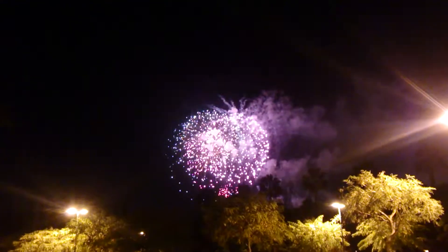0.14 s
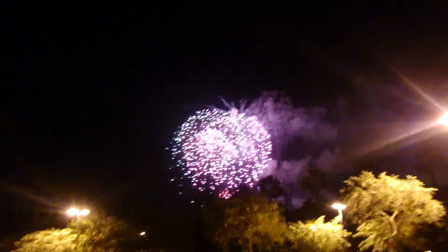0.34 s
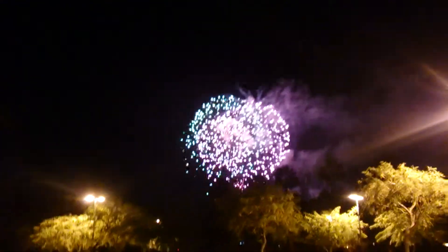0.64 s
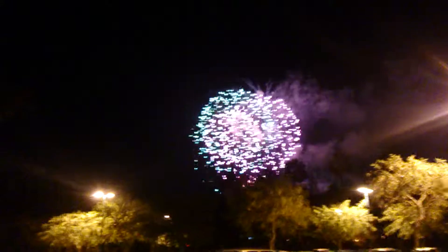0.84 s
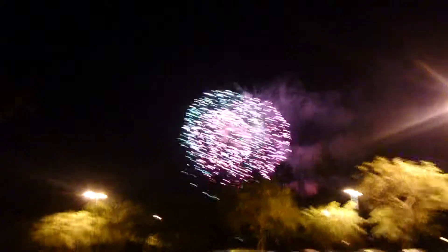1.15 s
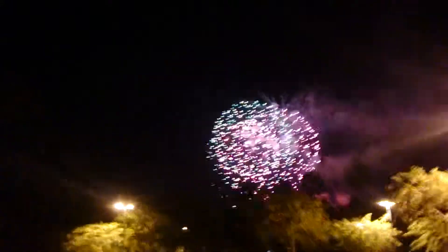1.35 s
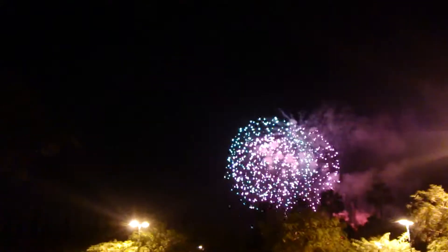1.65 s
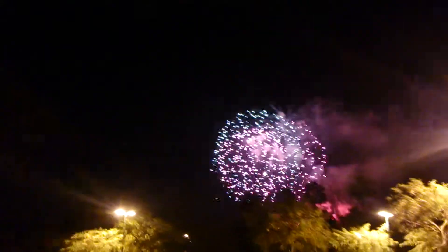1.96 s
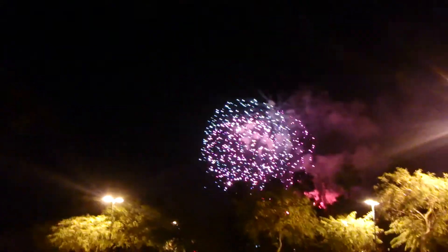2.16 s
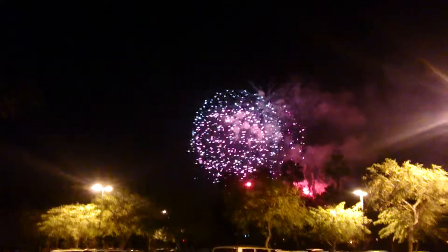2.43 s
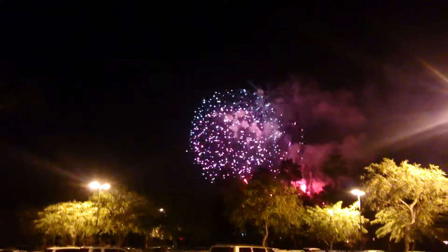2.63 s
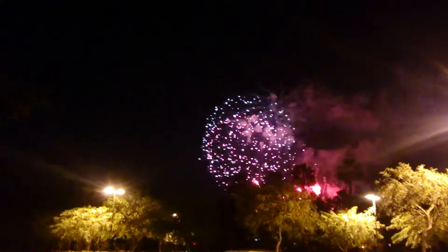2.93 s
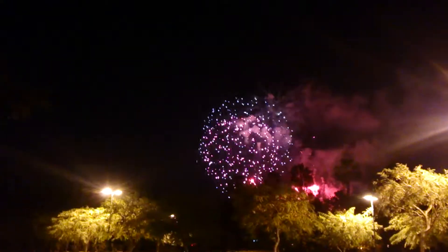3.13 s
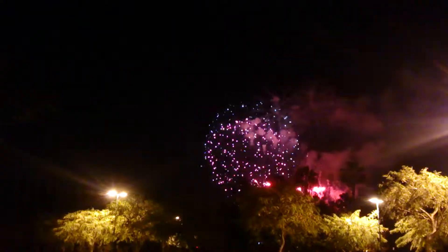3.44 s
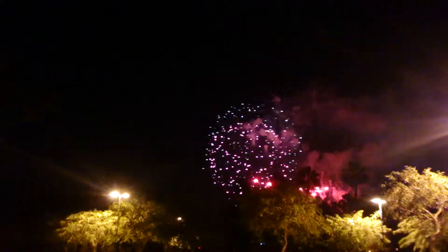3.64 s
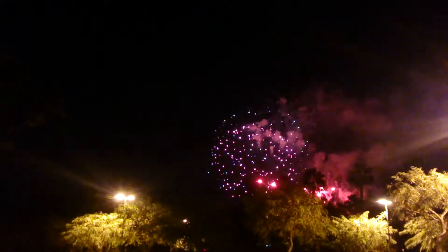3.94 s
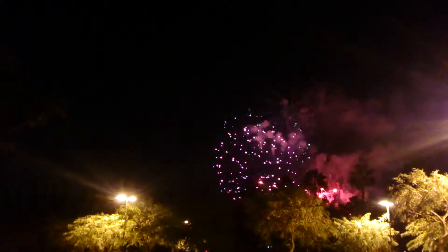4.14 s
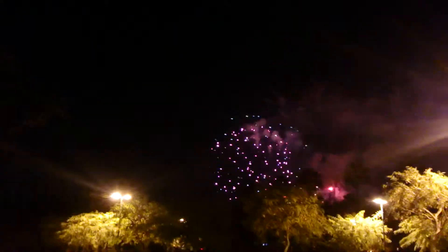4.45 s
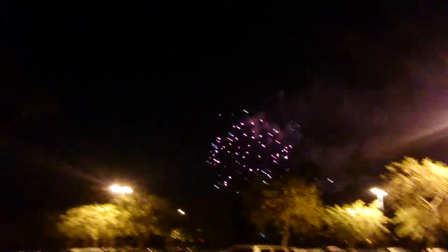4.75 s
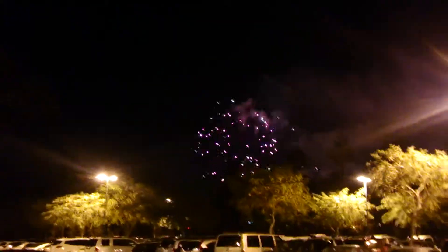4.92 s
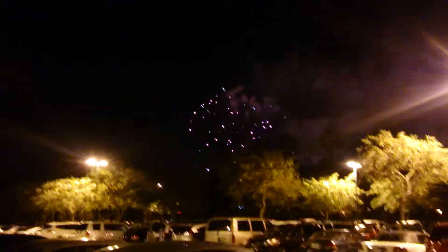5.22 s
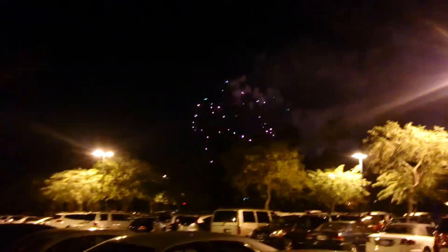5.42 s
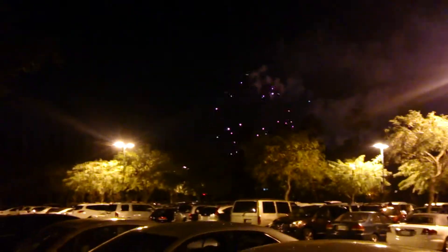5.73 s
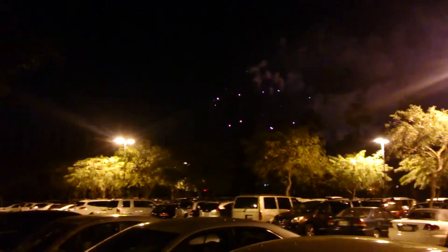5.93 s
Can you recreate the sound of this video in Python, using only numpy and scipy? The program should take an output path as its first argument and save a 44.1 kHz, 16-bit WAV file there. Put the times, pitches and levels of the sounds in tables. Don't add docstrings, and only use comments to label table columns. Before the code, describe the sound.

Loud distant aerial firework bursts in the first second and a half, rolling echoes dying away, small muffled pops, then plastic clicks and finger rubbing.

```python
import sys
import numpy as np
from scipy import signal
from scipy.fft import rfft, irfft, next_fast_len
from scipy.io import wavfile
from scipy.ndimage import uniform_filter1d

SR = 44100
rng = np.random.default_rng(int(sys.argv[2]) if len(sys.argv) > 2 else 0)


def boost(x):
    u = np.asarray(x, float) / 20
    return 10 ** u


def unload_audio(sound):
    columns = np.transpose(np.atleast_2d(sound))
    steps = np.round(np.clip(columns, -1, 1) * 32767)
    wavfile.write(sys.argv[1], SR, steps.astype(np.int16))


N = 268110
SPLIT = np.array([[0.5], [-0.5]])

# frequency_hz, density_db
HUM_SPECTRUM = [(8.8, -26), (15, -2.5), (38, 2.5), (95, -13.5), (114, -27), (130, -21.5), (170, -45),
                (290, -120)]
ROLL_SPECTRUM = [(59, -31.5), (100, -4.5), (216, -1.5), (309, -8.5), (409, -5.5), (973, -10), (1110, -14.5),
                 (1970, -17.5), (5000, -52.5), (6500, -77), (11000, -120)]
HISS_SPECTRUM = [(60, -41), (110, -18.5), (170, -6.5), (320, -13), (700, -9.5), (1000, -15), (2200, -18.5),
                 (2800, -26.5), (4000, -30), (8000, -36), (13500, -40), (16000, -46.5)]
# frequency_hz, correlation (no unit)
PORT_LIKENESS = [(60, 0.81), (150, 0.95), (380, 0.89), (950, 0.049), (2380, -0.071), (5980, -0.13),
                 (15000, 0.19)]
# frequency_hz, difference_db
FAR_PAN = [(60, -9), (130, -4), (290, -4.5), (640, -3.5), (1400, -7.5), (2400, -8), (4400, -1.5),
           (7500, -8.5), (10300, 6.5), (15000, 0)]
NEAR_PAN = [(60, -26), (200, -3), (700, -6), (1300, -3.5), (2400, -22), (4400, -9), (5400, -7), (6400, -29),
            (7600, -27), (8800, -22), (9800, -7.5), (12000, -17), (15000, -19)]
# start_s, peak_db, pitch_hz
POPS = [(1.297, -32.5, 302), (1.411, -34, 700), (2.099, -34, 646), (2.444, -32, 380), (2.606, -35.5, 820),
        (2.765, -31.5, 571), (2.79, -31.5, 560), (2.842, -33, 373), (3.003, -30.5, 960), (3.03, -30, 716),
        (3.115, -38, 597), (5.972, -32.5, 450), (6.015, -39, 350)]
# start_s, length_s, pitch_hz, level_db
SQUEAKS = [(1.33, 0.17, 13800, -78), (1.35, .18, 15000, -83), (1.566, 0.12, 13800, -84),
           (1.94, .07, 12250, -77), (4.654, 0.051, 11870, -60.5), (4.834, 0.14, 7400, -70),
           (4.885, .045, 8460, -75), (4.93, .055, 6700, -77), (4.944, .045, 8000, -79),
           (5.002, .07, 8620, -77), (5, 0.079, 6200, -77), (4.998, .03, 7200, -75), (5.1, .04, 7900, -75),
           (5.138, 0.033, 11920, -71), (5.147, 0.033, 6300, -72)]
# start_s, length_s, pitch_hz, level_db, glide_hz_per_s
SLIDES = [
    (2.059, 0.25, 8700, -70, -780),
    (4.447, 0.13, 2020, -74, -480),
    (4.83, .34, 14650, -81, 1030),
    (4.862, 0.26, 1935, -70, -680),
]
# late_s, length_s, pitch_hz, level_db
HINGE_PARTIALS = [(0, 0.14, 12230, -72), (0.015, 0.14, 5800, -70.5), (0.026, .135, 6290, -70)]
# start_s, low_partials_db, low_length_share (no unit)
HINGE_TURNS = [
    (2.571, 1.5, 0.74),
    (3.181, -9, .6),
]
# start_s, peak_db, case_db, left_minus_right_db
STRAP_TICKS = [(1.2994, -49.5, 1, 15), (1.364, -46.5, -1, 18), (1.5204, -37.5, -9, -9),
               (1.8532, -50.5, 0, -18), (1.92, -60, 3, -8), (2.021, -28.5, -31, -26),
               (2.0375, -45, -15, -18), (2.4359, -55, -2, -8), (2.4548, -58, -6.5, -10),
               (2.8155, -58, -2, -2.5), (3.0494, -62, -7, -2.5), (4.8333, -23.5, -18.5, -13)]
# start_s, peak_db, case_db, left_minus_right_db
PALM_CREAKS = [
    (4.2607, -53, -12, -14),
    (4.345, -42, -10, -22),
    (4.365, -51, -23, -19),
    (4.658, -50, -16, -12),
    (4.7202, -52, -8, -13),
    (4.9901, -43, -22, -16),
    (5.0712, -33, -26, -16),
    (5.2064, -19, -17.5, -26),
    (5.669, -50, -9, -15),
]
# start_s, peak_db, pitch_hz, lid_db, left_minus_right_db
LID_KNOCKS = [
    (0.184, -46, 4370, 11, -17),
    (1.3411, -32.5, 4000, -14, 29),
    (1.6903, -37.5, 3000, 8.5, -14),
    (4.7398, -40, 2860, 1, -14),
    (4.824, -39, 3060, -3.5, -10),
    (4.8818, -45.5, 3010, -7, -10),
]
# full_s, level_db, rise_s, hold_s, fall_s
STROKES = [
    (4.364, -65, .02, 0.0065, .08),
    (4.788, -70, .15, 0.0083, .05),
    (4.836, -51.5, .003, 0, 0.074),
    (5.078, -61, .01, 0.015, .07),
    (5.207, -54.5, .005, 0.037, 0.033),
    (5.933, -59.5, .035, .2, .05),
    (5.98, -52, 0.091, .2, .05),
]
# frequency_hz, density_db
SKIN_SPECTRUM = [(90, -29.5), (180, -8), (420, -4.5), (700, -9), (2300, -8), (4300, -14), (5000, -23),
                 (6200, -9), (8100, -1), (9000, -25.5), (11000, -24), (14000, -26.5), (16000, -60)]
# start_s, case_hz, knock_db, knock_t60_s, rasp_db, rasp_t60_s
CASE_SNAP = (5.1762, 202, -15.5, 0.085, -18.5, .07)
# frequency_hz, density_db
RASP_SPECTRUM = [(180, -22), (300, 3), (450, 2), (800, -3), (1400, -2.5), (2200, -2.5), (4000, -14),
                 (5200, -19.5), (6400, -4.5), (7600, 5.5), (8800, -11), (12500, -7.5), (16000, -26)]
# start_s, blast_db, push_ms, back_shock_ms
SHELLS = [
    (0.0353, 0, 1.67, 2.4),
    (0.3784, 0, 0.89, 2.3),
    (.899, 0.5, 1.2, 2.26),
    (1.4587, 0, 1.35, 2.37),
]
# delay_ms, level_db, bottom_hz, top_hz
BOUNCES = [(4.313, -1, 39, 560), (11.88, -3, 700, 2600), (13.22, -6.5, 32, 590), (22.18, -5.5, 115, 1100),
           (32.96, -16.5, 22, 270)]
# delay_s, level_change_db
WALLS = [(.063, 2.5), (.091, 1), (.15, -2.5), (.235, 0.5), (.27, -1.5)]
# frequency_hz, density_db
SCATTER_SPECTRUM = [(18, -40), (50, -7.5), (90, 0.5), (138, -7), (266, -7), (473, -13), (684, -10),
                    (937, -16), (2060, -18), (3500, -25.5), (5590, -37), (7670, -42.5), (11100, -52.5),
                    (16000, -64)]
# frequency_hz, t60_s
AIR_DECAY = [(40, 15.3), (200, 3.6), (1000, 3), (3500, 3.1), (7500, 1.64), (9500, .3), (15000, 0.08)]


def unit(x):
    return x / np.sqrt(np.mean(x ** 2) + 1e-20)


def along(points, hz):
    f, v = np.transpose(points)
    return np.interp(np.log(hz + 1), np.log(f + 1), v)


def filtered(x, response):
    size = x.shape[-1]
    m = next_fast_len(size + min(size, 4096), True)
    return irfft(rfft(x, m) * response(np.fft.rfftfreq(m, 1 / SR)), m)[..., :size]


def peak(hz, centre_hz, width_hz):
    return 1j * hz * width_hz / (centre_hz ** 2 - hz ** 2 + 1j * hz * width_hz)


def panned(x, pan):
    return filtered(x, lambda hz: boost(along(pan, hz) * SPLIT))


def add(track, sound, s):
    part = track[:, round(s * SR):][:, :sound.shape[1]]
    part += sound[:, :part.shape[1]]


def rush(spectrum, size, patchy_db, fade_db=lambda hz, t: 0):
    hz = np.fft.rfftfreq(512, 1 / SR)[:, None]
    t = np.arange(size // 256 + 2) * 256 / SR
    a, b, c, d, field = rng.standard_normal((5, len(hz), len(t)), dtype=np.float32)
    field = uniform_filter1d(uniform_filter1d(field, size=12, axis=0), size=3, axis=1)
    turn = np.arccos(np.clip(along(PORT_LIKENESS, hz), -1, 1)) / 2
    mid = (a + 1j * b) * np.cos(turn)
    side = (c + 1j * d) * np.sin(turn)
    z = np.array([mid + side, mid - side]) * boost(patchy_db * unit(field) + fade_db(hz, t))

    def colour(f):
        return boost(along(spectrum, f) + along(FAR_PAN, f) * SPLIT)

    both_ports = colour(np.linspace(0, SR / 2, num=8000)).mean(axis=0)
    scale = np.sqrt(np.mean(both_ports ** 2)) * 20
    noise = signal.istft(z, SR, nperseg=512)[1][:, :size]
    return filtered(noise, colour) / scale


def night():
    t = np.arange(N) / SR
    late_db = -45 - 3.5 * np.maximum(t - 2.02, 0)
    late_db = late_db - 5 * np.clip((t - 3.46) / 0.44, 0, 1)
    hum = boost(-44) * rush(HUM_SPECTRUM, N, patchy_db=2.0)
    roll = boost(late_db) * rush(ROLL_SPECTRUM, N, patchy_db=1.5)
    hiss = boost(-58 + 0.1) * rush(HISS_SPECTRUM, N, patchy_db=1.14)
    return hum + roll + hiss


def far_pops():
    out, t = np.zeros((2, N)), np.arange(2600) / SR
    for s, db, hz in POPS:
        decay = boost(-60 * t / 0.032) + 0.44 * boost(-60 * t / 0.2)
        onset = 1 - np.exp(-t / 0.00091)
        puff = rng.standard_normal(len(t)) * decay * onset
        puff = filtered(puff, lambda f: peak(f, hz, 0.74 * hz) ** 2 / (1 + 1j * f / 1800) ** 2)
        add(out, boost(db - 4.0) * panned(puff / np.abs(puff).max(), FAR_PAN), s)
    return out


def squeaks():
    out = np.zeros((2, N))
    rows = [(*row, 0) for row in SQUEAKS]
    for s, low_db, share in HINGE_TURNS:
        for late, long, hz, db in HINGE_PARTIALS:
            low = hz < 9000
            rows.append((s + late, long * (share if low else 1), hz, db + low_db * low, 0))
    for start, long, hz, db, glide in rows + SLIDES:
        u = np.linspace(0, 1, round(long * SR))
        waver = uniform_filter1d(rng.standard_normal((2, SR // 2)), size=150, axis=1)
        pitch_waver, level_waver = unit(waver)[:, :len(u)]
        tone = np.sin(2 * np.pi * np.cumsum(hz + glide * long * u + 45 * pitch_waver) / SR)
        level = boost(db + 8.0 + 3.4 * level_waver)
        swell = np.minimum(u / 0.14, 1) * (1 - 0.9 * u ** 0.9)
        side = boost([[-6], [3]] if start > 4.4 else [[0], [0]])
        add(out, side * tone * level * swell, start)
    return out


def rattle(count=5):
    rows = []
    for n, (a, b, c) in enumerate(rng.uniform(-0.84, 1, size=(count, 3))):
        start_s = 4.75 + 0.0054 * (n + 0.19 * a)
        peak_db = -46.5 - 1.7 * n + 2.1 * b
        rows.append((start_s, peak_db, 2780 * (1 + 0.04 * c), 6, -5))
    return rows


def ticks():
    out, t = np.zeros((2, N)), np.arange(900) / SR
    case_hz, t60_s = 2360, 0.013
    rows = [(s, db, case_hz, *rest, -15.5) for s, db, *rest in STRAP_TICKS]
    rows += [(s, db, case_hz, *rest, -29) for s, db, *rest in PALM_CREAKS]
    rows += [(*row, -21.5) for row in LID_KNOCKS + rattle()]
    decay = boost(-60 * t / t60_s / np.array([[1], [1.8], [0.8]]))
    onset = 1 - np.exp(-t / 0.000216)
    for s, db, body_hz, body_db, pan_db, top_db in rows:
        burst = rng.standard_normal((3, len(t))) * decay * onset
        cavity_hz = 7500 if pan_db < 0 else 9200

        def modes(f):
            return np.array([peak(f, cavity_hz, 2200), peak(f, body_hz, 1150), peak(f, 11650, 5000)]) ** 3

        parts = filtered(burst, modes)
        parts = parts / np.abs(parts).max(axis=1, keepdims=True)
        cavity, body, top = parts * boost([[db - 4.0], [db + body_db + 1.5], [db + top_db + 7.5]])
        wide = boost(SPLIT * pan_db - abs(pan_db) / 2 + min(abs(pan_db), 11) / 2)
        narrow = boost(SPLIT * np.clip(pan_db, -8, 8))
        add(out, wide * (cavity + top) + narrow * body, s)
    return out


def effort(t):
    total = (t > 3.3) * (t < 5.17) * boost(-88.5 + 9.5 * (t - 3.3))
    for s, db, rise, hold, fall in STROKES:
        before = (s - t) / (abs(rise) + 1e-4)
        after = (t - s - hold) / (abs(fall) + 1e-4)
        away = np.maximum(np.maximum(before, after), 0)
        total = total + boost(db - 30 * away)
    return total


def port_notch(f):
    return 1 - 0.9 * peak(f, 9700, 1400)


def shadow(x):
    return filtered(x, lambda f: boost(along(NEAR_PAN, f) * np.array([[1], [0]])))


def finger_rub():
    noise = rng.standard_normal((2, N)) + 0.98 * rng.standard_normal(N)
    skin = unit(filtered(noise, lambda f: boost(along(SKIN_SPECTRUM, f)) * port_notch(f)))
    grain = boost(1.3 * unit(uniform_filter1d(rng.standard_normal(N), size=200)))
    return boost(6.0) * effort(np.arange(N) / SR) * grain * shadow(skin)


def case_snap():
    out, t = np.zeros((2, N)), np.arange(SR // 10) / SR
    s, hz, knock_db, knock_t60, rasp_db, rasp_t60 = CASE_SNAP
    swing = np.sin(2 * np.pi * hz * (t - 0.0008))
    overtone = 0.3 * np.sin(4 * np.pi * hz * t)
    knock = (swing + overtone) * boost(knock_db + 1.5 - 60 * t / knock_t60)
    noise = rng.standard_normal(len(t))
    rasp = unit(filtered(noise, lambda f: boost(along(RASP_SPECTRUM, f)) * port_notch(f)))
    rasp = rasp * (0.45 + 0.5 * np.abs(swing) + 0.25 * swing) * boost(rasp_db + 6 - 60 * t / rasp_t60)
    add(out, shadow(knock + rasp) * np.minimum(t / 0.0013, 1), s)
    return out


def car_slivers(ms):
    sparse = rng.standard_normal((2, len(ms))) ** 3
    slivers = sparse * boost(-60 * ms / 70) * np.clip(ms / 1.54, 0, 1)
    colour = lambda hz: (peak(hz, 1550, 1470) + 0.12) / (1 + 1j * hz / 5500) ** 3
    return 0.16 * filtered(slivers, colour) * boost([[-2.5], [1.5]])


def half_wave(ms, long_ms, soft_ms):
    level = 0.5 + 0.75 * np.exp(-np.abs(ms) / 0.16)
    end = 1 + np.exp(np.clip((ms - long_ms) / soft_ms, -30, 30))
    return (ms >= 0) * level / end


def paths(hz):
    total = 1
    for delay_ms, db, bottom_hz, top_hz in BOUNCES:
        echo = boost(db) * np.exp(-2j * np.pi * hz * delay_ms / 1000)
        total = total + echo * 1j * hz / (bottom_hz + 1j * hz) / (1 + 1j * hz / top_hz)
    return total


def ports(hz):
    left = 1 + 0.3 * peak(hz, 2600, 900)
    right = 1 + 0.79 * peak(hz, 2290, 370)
    return np.array([left, right]) / (1 + 1j * hz / 5500) ** 3


def roll_fade_db(hz, t):
    swells = sum(db * np.exp(-((t - delay) / 0.0099) ** 2) for delay, db in WALLS)
    return -17 * np.log10(1 + t / 0.012) - 60 * t / along(AIR_DECAY, hz) + swells


def shells():
    out, ms = np.zeros((2, N)), np.arange(SR // 10) / SR * 1000
    port_ms = ms - np.array([[0], [0.1]])
    roll_onset = np.clip(np.arange(2 * SR) / SR / 0.0035, 0, 1)
    for s, db, push_ms, back_ms in SHELLS:
        push = half_wave(port_ms, push_ms * np.array([[0.65], [1.1]]), 0.047)
        back_shock = half_wave(port_ms - back_ms, 1.32, 0.14)
        blast = filtered(back_shock - push, lambda hz: paths(hz) * ports(hz))
        add(out, boost(db - 0.56) * (blast + car_slivers(ms)), s)
        roll = rush(SCATTER_SPECTRUM, size=2 * SR, patchy_db=3.0, fade_db=roll_fade_db)
        add(out, boost(db - 13.5) * roll * roll_onset, s)
    return out


def scene():
    return night() + far_pops() + squeaks() + ticks() + finger_rub() + case_snap() + shells()


def low_pass(x):
    return signal.sosfilt(signal.butter(12, 16520, fs=SR, output="sos"), x)


def record(dry):
    clipped = dry / (1 + np.abs(dry / 1.18) ** 6) ** (1 / 6)
    mix = filtered(clipped, lambda hz: 1 / (1 + (hz / 15700) ** 60))
    return low_pass(mix)


dry = scene()
out = record(dry)
unload_audio(out)
```